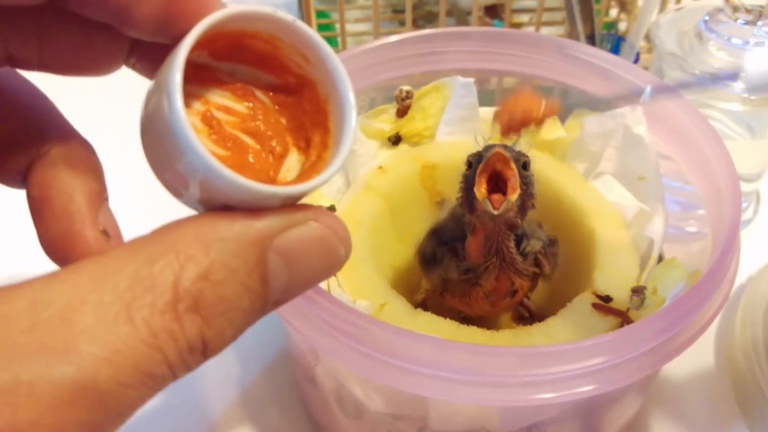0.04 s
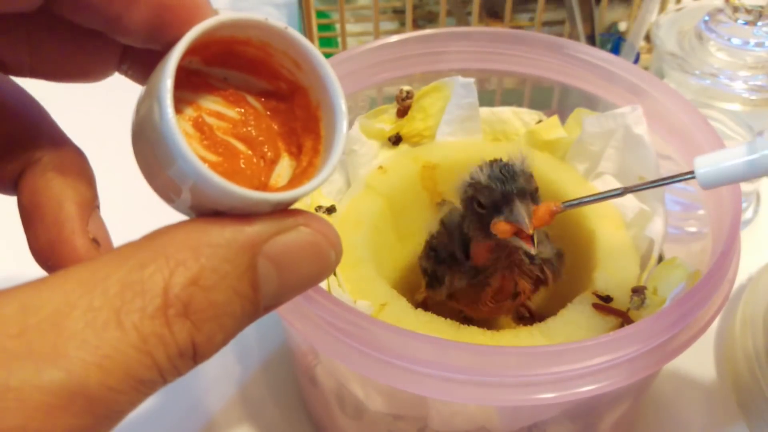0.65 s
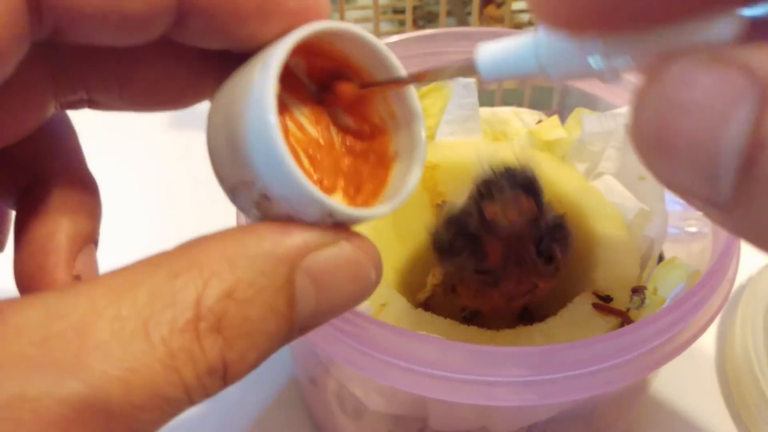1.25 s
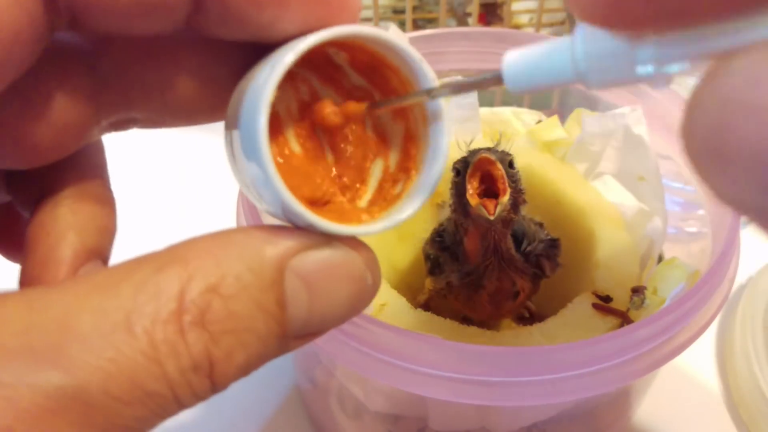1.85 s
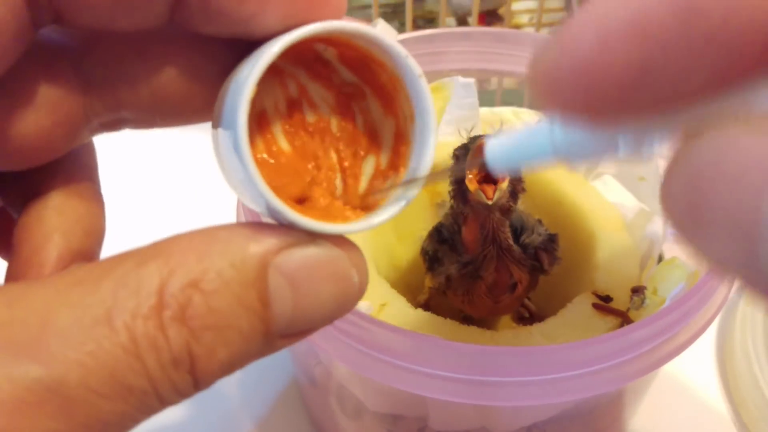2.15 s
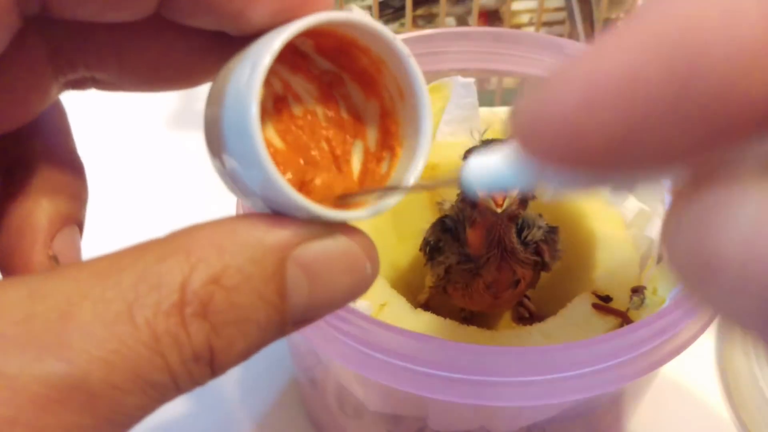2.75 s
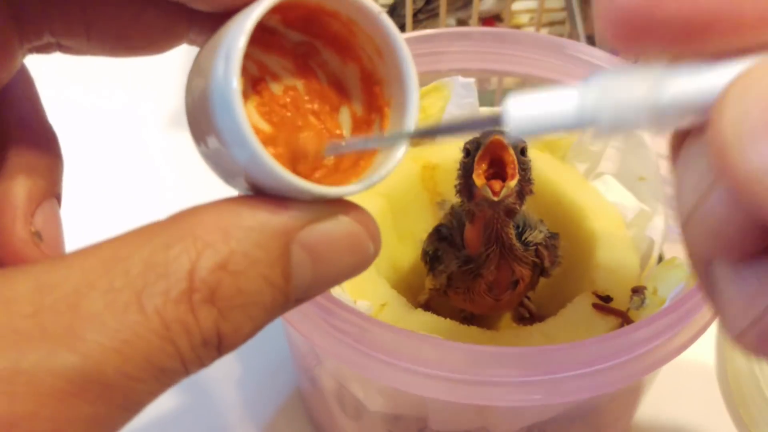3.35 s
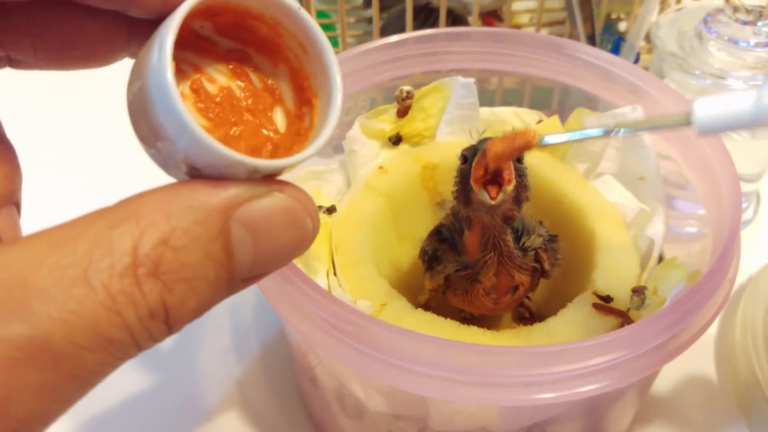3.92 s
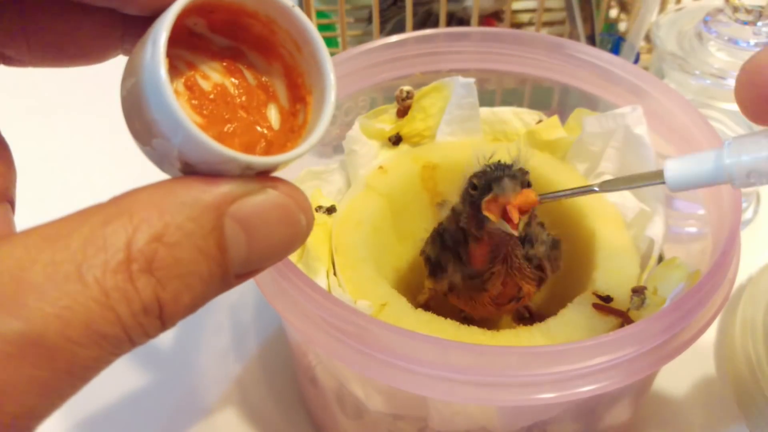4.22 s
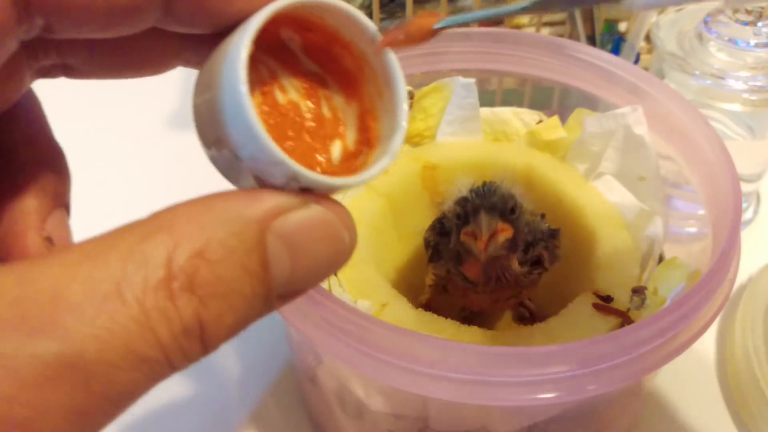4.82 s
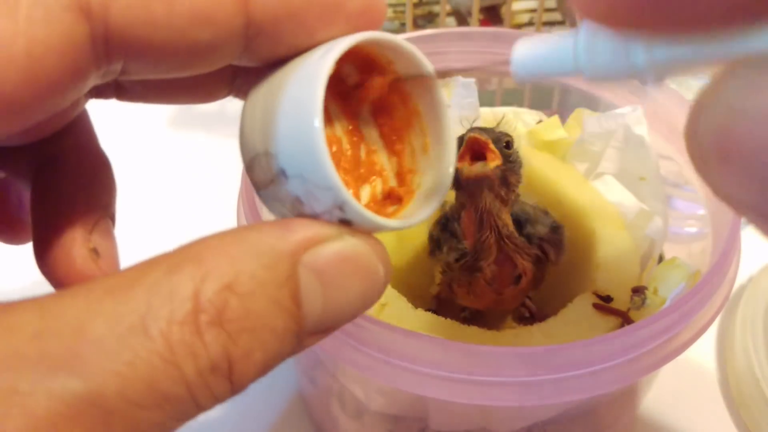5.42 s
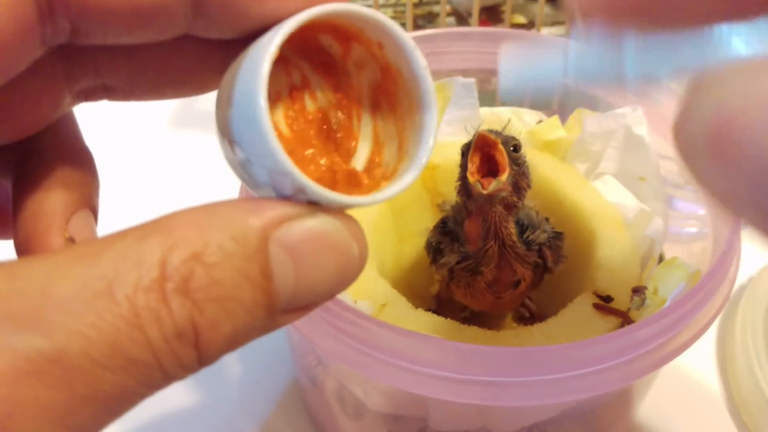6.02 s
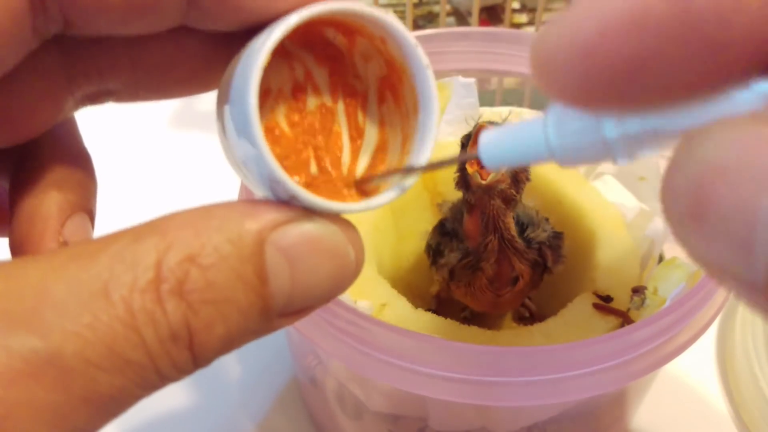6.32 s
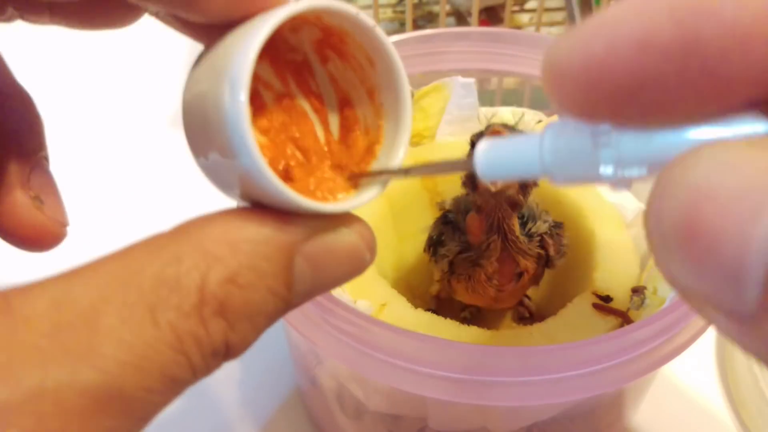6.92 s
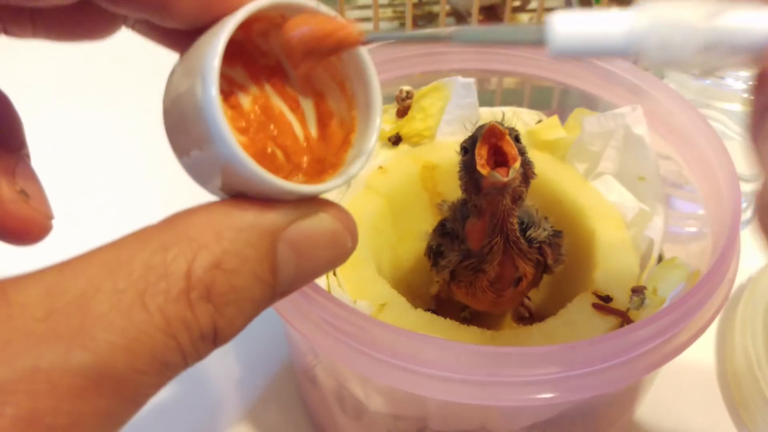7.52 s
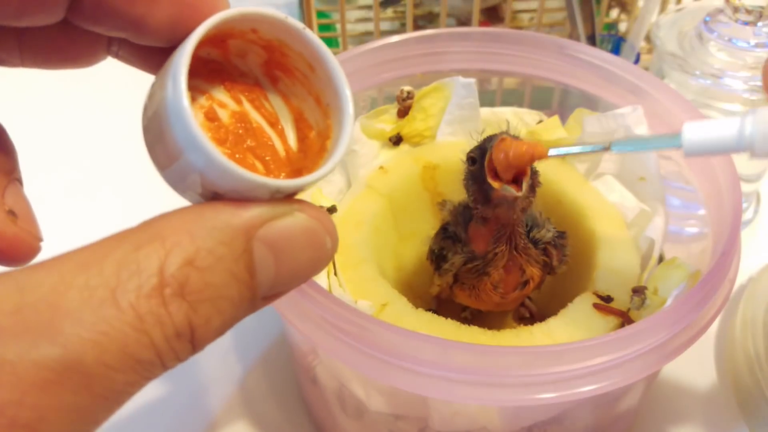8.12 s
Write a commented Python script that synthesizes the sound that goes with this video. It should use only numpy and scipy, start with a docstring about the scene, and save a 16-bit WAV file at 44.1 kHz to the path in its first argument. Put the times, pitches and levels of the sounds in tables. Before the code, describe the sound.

A chick begs close to the microphone in a quiet room, giving quick buzzy chirps that leap up and slide down, mixed with thin whistles that swell into shrill peaks. The calling runs throughout. After about a second, a small metal spatula starts ticking against a china cup in scattered clusters. Fingers rub and bump very softly, and a faint hum lies underneath.

```python
"""Feeding a canary chick

A chick begs in its nest bowl, close to the microphone in a quiet room, while it is fed from a small
china cup. One side of its syrinx gives buzzy chirps that leap up and slide down; the other gives thin
whistles that swell to a shrill peak. A metal spatula ticks on the cup, hands rub and bump softly,
and the room hums faintly."""
import sys
import numpy as np
from scipy import signal
from scipy.fft import rfft, irfft
from scipy.io import wavfile
from scipy.ndimage import map_coordinates

SR = 44100
rng = np.random.default_rng(int(sys.argv[2]) if len(sys.argv) > 2 else 0)


def materialize(psi):
    """Save the field psi as 16-bit PCM at rate SR to the path in sys.argv[1].

    A 1-D psi becomes a single channel; in a 2-D psi each row is a channel.
    """
    bounded = np.clip(np.atleast_2d(psi).T, -1, 1)
    quanta = np.round(bounded * 32767).astype(np.int16)
    wavfile.write(sys.argv[1], SR, quanta)


N = 359856
DROOP_HZ = 950  # pitch drop as the push behind a whistle or shriek ends


def undb(db):
    """Decibels to gain."""
    return 10 ** (np.asarray(db) / 20)


def unit(x):
    """Scale to rms 1."""
    return x / np.sqrt(np.mean(x ** 2))


def add(out, start, x):
    """Mix x into out from start seconds on."""
    i = int(start * SR)
    out[..., i:i + x.shape[-1]] += x[..., :N - i]


def noise(n, points):
    """Noise of rms 1, coloured by (frequency [Hz], level [dB]) points."""
    hz, db = np.transpose(points)
    bins_hz = np.maximum(np.arange(n // 2 + 1) * SR / n, 1)
    colour = undb(np.interp(np.log(bins_hz), np.log(hz), db))
    return unit(irfft(rfft(rng.standard_normal(n)) * colour, n))


def wander(n, hz):
    """Smooth random drift, spread near 1, that changes about hz times a second."""
    knots = rng.standard_normal(n)[:int(n * hz / SR) + 2]
    return map_coordinates(knots, [np.arange(n) * hz / SR], order=3, mode="nearest")


def turn(hz):
    """Phase of a moving frequency."""
    return 2 * np.pi * np.cumsum(hz) / SR


def fade(t, attack_s, release_s):
    """Linear attack, hold, linear release."""
    return np.clip(np.minimum(t / attack_s, (t[-1] - t) / release_s), 0, 1)


def panned(x, db):
    """Constant-power pan, with the left db louder than the right."""
    gain = undb(np.array([[1], [-1]]) * db / 2)
    return x * gain / np.sqrt(np.mean(gain ** 2, axis=0))


def room_tone(air_db=-62):
    """Still air, narrower in the bass, under a faint wavering hum of mains and fan."""
    # spectrum of the air: (frequency [Hz], relative level [dB])
    air_colour = [(12, -27), (30, -9), (60, -3.5), (110, -9), (330, -10), (500, -15.5), (1200, -19.5),
                  (2600, -19.5), (5000, -27.5), (10000, -31.5), (16000, -35.5)]
    # mains and fan tones: (frequency [Hz], rms level [dB])
    hum_tones = [(59.3, -81), (119, -75), (365, -89), (790, -81), (1018, -81.5), (1244, -84.5)]
    side_colour = [(hz, db + np.interp(np.log(hz), np.log([200, 1200]), [-8, -1]))
                   for hz, db in air_colour]
    mid = noise(N, air_colour)
    side = undb(-2) * noise(N, side_colour) * np.array([[1], [-1]])
    hum = sum(np.sqrt(2) * undb(db + 1.1 * wander(N, 3)) * np.sin(turn(hz + wander(N, 4.1)))
              for hz, db in hum_tones)
    return (mid + side) * undb(air_db + .5 * wander(N, 1.4)) + hum


def high_voice(hz, droop_hz, db, shudder_hz=424, unstable_hz=7450, unstable_width_hz=430):
    """A nearly pure tone that shudders when it is pushed between its two registers."""
    n = len(hz)
    push = np.clip((db + 49.5) / 14, 0, 1)
    shudder = push * np.exp(-((hz - unstable_hz) / unstable_width_hz) ** 2)
    flutter = shudder * np.cos(turn(shudder_hz * (1 + .15 * wander(n, 200))))
    unsteady = np.interp(hz, [7600, 8300], [1, .25])
    waver = unsteady * (.0056 * wander(n, 110) + .006 * wander(n, 1200))
    phase = turn((hz - droop_hz) * (1 + waver)) + .26 * flutter
    # the octave fades as the pitch climbs into the beak's resonance
    octave_db = np.interp(hz, [7000, 7600], [-18, -40]) - .6 * np.maximum(db + 47, 0)
    tone = np.sin(phase) + undb(octave_db) * np.sin(2 * phase)
    sway = (1 + .5 * flutter) * undb((1.2 * unsteady + 3.4 * shudder) * wander(n, 150))
    return np.sqrt(2) * tone * sway * undb(db)


def whistle(length, hz, db, swell_db, scoop_hz=938, scoop_s=.028, droop_s=.01):
    """The pitch scoops up and holds; a whistle with little swell droops at its end."""
    t = np.arange(int(length * SR)) / SR
    pitch = hz - scoop_hz * np.exp(-t / scoop_s)
    slack = np.interp(swell_db, [4, 9], [1, 0])
    droop = slack * DROOP_HZ * np.exp((t - length) / droop_s)
    level_db = db + swell_db * (t / length) ** 3
    return high_voice(pitch, droop, level_db) * fade(t, attack_s=.03, release_s=.014)


def high_calls():
    """Whistles and shrieks; their beam favours one side by an amount that shifts as the head turns."""
    # thin whistles: (time [s], length [s], pitch [Hz], level [dB], swell [dB], left over right [dB])
    whistles = [(.052, 0.16, 6900, -45.5, 12, 6), (1.6, 0.094, 7230, -53, 10, 14),
                (2.01, 0.15, 7050, -48.5, 2.5, 19), (2.375, 0.18, 7160, -47.5, 16, 16),
                (2.79, 0.18, 7120, -50.5, 12, 24), (3.226, .198, 6920, -45, -1, 5.5),
                (3.92, .075, 6780, -46, 14, 7), (5.435, 0.074, 7120, -58, 30, 14),
                (5.74, .14, 7220, -52, 19, 12), (6.14, .152, 7000, -51, 2, 11),
                (6.495, .18, 7090, -46.5, -3.5, 18), (6.965, 0.12, 7160, -48, 23, 5),
                (7.41, 0.14, 6910, -51, 3, 10), (8.04, 0.098, 7040, -47.5, 22, 6)]
    # shrill peaks: (time [s], length [s], top pitch [Hz], level [dB], left over right [dB])
    shrieks = [(.19, .11, 8535, -18, 12), (1.711, .067, 8680, -20, 20), (2.513, .048, 7400, -32.5, 14),
               (2.957, 0.053, 7600, -25, 5), (3.362, .05, 7020, -38.5, 2), (3.981, 0.12, 8500, -20.5, 10.5),
               (5.508, 0.067, 8540, -22.5, 11), (5.87, 0.071, 8150, -27, 11),
               (7.053, 0.085, 8410, -26.5, 22), (8.106, 0.097, 8130, -26, 9)]
    out = np.zeros((2, N))
    for calls, voice in (whistles, whistle), (shrieks, shriek):
        for start, *shape, pan_db in calls:
            add(out, start, panned(voice(*shape), pan_db))
    return out


def by_effort(relaxed, forced, effort):
    """Blend from the relaxed value at effort 0 to the forced one at 1."""
    return np.interp(effort, [0, 1], [relaxed, forced])


def chirp_pitch(t, lead_hz, peak_hz, effort, rest_hz=1900, rise_s=.008, relax_s=.072):
    """The membrane snaps tight from a short shelf, lets go at t = 0, then slackens slowly."""
    slide_hz, let_go_s = by_effort(2510, 3533, effort), by_effort(.016, .008, effort)
    leap = lead_hz + (peak_hz - lead_hz) * np.exp(-(t / rise_s) ** 2)
    let_go = (peak_hz - slide_hz) / (1 + (t / let_go_s) ** 2) ** 2
    slide = rest_hz + (slide_hz - rest_hz) * np.exp(-t / relax_s)
    return np.where(t < 0, leap, slide + let_go)


def chirp_level(t, length, effort, peak_db, slide_db):
    """Envelope in dB: a softer lead-in, a peak at the leap, then a fading slide."""
    lead_db = peak_db + by_effort(-8.5, -6, effort)
    tail_db = by_effort(-55.5, -43, effort ** 2)
    points = [(t[0], lead_db - 15.5), (-.022, lead_db - 6), (-.013, lead_db + 3),
              (-.009, peak_db), (.005, peak_db), (.016, (peak_db + slide_db) / 2 - 1),
              (min(.035, length / 2), slide_db), (.78 * length, tail_db),
              (length, tail_db - 12.5), (length + .01, tail_db - 32)]
    return np.interp(t, *np.transpose(points)) + .85


def chirp(lead_s, length, lead_hz, peak_hz, effort, peak_db, slide_db):
    """A gliding tone chopped by a fast flutter; soft calls start clean, forced ones with a rasp."""
    t = np.arange(-lead_s, length + .01, 1 / SR)
    n = len(t)
    hz = chirp_pitch(t, lead_hz, peak_hz, effort)
    force = np.clip((slide_db + 50) / 11, 0, 1)
    # a short shelf of steady pitch leads into the strained leap
    shelf = np.interp(t, [-.014, -.008], [1, 0])
    strain = (1 - shelf) / (1 + (t / .013) ** 2)
    # the flutter quickens, deepens and grows uneven with tension
    buzz_hz = by_effort(271.8, 543.3, effort ** 2) * (1 + 1.1 * strain)
    flutter = turn(buzz_hz * (1 + (.08 + .12 * strain) * wander(n, 397.7)))
    depth = .6 + .25 * strain * effort - .45 * shelf * (1 - force)
    jitter = .011 + .0067 * strain + .0191 * shelf * force
    # the pitch rises with each flutter pulse, so the sidebands lie above the tone
    phase = turn(hz * (1 + jitter * wander(n, 1005) + .012 * wander(n, 70))) + depth * np.sin(flutter)
    pulse = unit(np.exp(depth * np.cos(flutter))) * undb(2.4 * wander(n, 400))
    bright_db = np.interp(t, [-.014, -.004, .02], [-9, -15, -17]) + by_effort(-3, -.5, effort)
    tone = np.sin(phase)
    for k in range(2, 5):
        beak_db = np.interp(k * hz, [9000, 12000, 18000], [0, -4, -22])
        tone += undb(bright_db + beak_db - 4.94 * (k - 3)) * np.sin(k * phase) * (k * hz < SR * .42)
    rasp_db = np.interp(t, [-.03, .004, .03], [-10, -18, -21]) + force * (3 + 3 * shelf)
    rasp = noise(n, [(1400, -23.5), (3000, -11), (5500, 6), (8000, -2.5), (11000, -12.5), (15000, -14.5)])
    voice = np.sqrt(2) * tone * undb(-4 * shelf * force) + rasp * undb(rasp_db)
    return voice * pulse * undb(chirp_level(t, length, effort, peak_db, slide_db))


def chirps(lead_s=.028):
    """The run of begging chirps; the open beak beams their treble to the left."""
    # begging calls: (time of peak [s], slide length [s], lead-in pitch [Hz], peak pitch [Hz],
    # effort [0-1], peak level [dB], slide level [dB])
    calls = [(0.108, 0.065, 4000, 5640, 0.07, -37.5, -59), (0.153, 0.13, 3700, 5740, 0.9, -34, -39),
             (0.476, 0.049, 3650, 4950, 0.2, -37.5, -60), (0.56, 0.097, 3300, 5730, 0.14, -38.5, -56),
             (.991, .11, 3500, 6370, 1, -33, -37.5), (1.25, 0.1, 3800, 5070, 0.2, -35, -44),
             (1.57, 0.086, 3950, 6180, 0.34, -39, -61), (1.704, 0.11, 3900, 6540, 0.93, -33, -36.5),
             (1.97, .14, 3650, 5490, 0.96, -30.5, -40.5), (2.304, .09, 3500, 6160, 0.42, -40, -55),
             (2.488, 0.077, 4100, 5700, 0.08, -45, -55.5), (2.667, 0.1, 3750, 5690, 0.26, -41, -51),
             (2.754, 0.13, 4200, 6190, 0.87, -33, -37.5), (3.144, 0.098, 3350, 6230, 0.32, -41.5, -52),
             (3.274, .11, 3950, 5450, 0.31, -38, -48), (3.626, 0.087, 3400, 5950, 0.28, -43, -51),
             (3.746, 0.087, 3700, 5800, 0.95, -32, -38.5), (3.893, 0.13, 4200, 5480, 0.93, -30.5, -37),
             (4.245, 0.087, 3950, 6250, 0.37, -40, -50), (4.373, 0.1, 4050, 5520, 0.34, -39, -48),
             (4.684, 0.058, 3500, 5950, 0.18, -48, -52), (4.794, 0.11, 4200, 6200, 0.81, -32, -39),
             (4.876, .11, 3200, 5480, 0.3, -41.5, -51), (5.353, 0.13, 4200, 6450, 0.94, -30.5, -38.5),
             (5.692, 0.13, 3850, 5730, 0.98, -29, -38.5), (6.34, 0.12, 3200, 6070, 0.26, -36.5, -49),
             (6.423, 0.12, 4200, 6550, 0.99, -30.5, -42), (6.712, 0.07, 3800, 5530, 0.33, -42, -61.5),
             (7.007, 0.14, 3700, 6280, 0.32, -39.5, -47), (7.042, 0.13, 3100, 5200, 0.95, -33, -40),
             (7.268, 0.14, 3100, 5290, 0.32, -35.5, -45), (7.329, 0.13, 3800, 5840, 0.98, -30, -38.5),
             (7.855, 0.12, 3850, 5930, 0.32, -39.5, -50.5)]
    # beam of the beak: (frequency [Hz], left over right [dB])
    beam = [(2500, 0.6), (5500, 8), (8000, 13), (11000, 13)]
    out = np.zeros(N)
    for peak_time, *shape in calls:
        add(out, peak_time - lead_s, chirp(lead_s, *shape))
    beam_db = np.interp(np.arange(N // 2 + 1) * SR / N, *np.transpose(beam))
    return irfft(panned(rfft(out), beam_db), N)


def shriek(length, hz, db, break_hz=7240, break_db=-7, climb_at_s=.025, climb_s=.0056):
    """Pitch and level climb together into the loud register, hold, then drop away."""
    t = np.arange(int(length * SR)) / SR
    climb = 1 / (1 + np.exp((climb_at_s - t) / climb_s))
    top_hz = hz - 900 * (t - climb_at_s)  # the held top sinks slowly
    pitch = break_hz + (top_hz - break_hz) * climb
    droop = DROOP_HZ * np.exp((t - length) / .007)
    level_db = db + break_db * (1 - climb)
    return high_voice(pitch, droop, level_db) * fade(t, attack_s=.0091, release_s=.0055)


def hoarse_notes():
    """Barely voiced notes with an unsteady pitch."""
    # faint notes between the calls: (time [s], length [s], pitch [Hz], level [dB])
    notes = [(0.714, 0.079, 2750, -60), (0.854, 0.14, 2610, -61.5), (5.139, .11, 2620, -70.5),
             (5.975, 0.025, 3200, -51), (6.195, 0.19, 2540, -65)]
    out = np.zeros(N)
    for start, length, hz, db in notes:
        n = int(length * SR)
        tone = np.sin(turn(hz * (1 + .052 * wander(n, 783))))
        add(out, start, undb(db) * np.sqrt(2 * np.hanning(n)) * tone)
    return out


def spatula_taps(accent_db=8, delay_s=.0015):
    """Each touch of the spatula clicks and rings the cup; the contact point picks the brightest modes."""
    # spatula on the cup: (time [s], level [dB], brightest ring [Hz])
    taps = [(1.275, -21.5, 3300), (1.34, -23.5, 12600), (1.513, -11.5, 8600), (2.118, -25, 6600),
            (2.165, -18.5, 7570), (2.544, -20.5, 6940), (2.922, -12.5, 8500), (3.161, -16, 10700),
            (4.986, -39, 1570), (5.067, -29.5, 6150), (5.134, -34.5, 7260), (5.296, -36.5, 4000),
            (6.124, -21, 3160), (6.157, -19.5, 4250), (6.173, -34, 3330), (6.18, -13.5, 11800),
            (6.517, -28, 2270), (6.553, -27, 6660), (6.912, -21.5, 6400), (7.109, -19, 8100)]
    # modes of the cup, damped by the fingers: (frequency [Hz], level [dB], t60 [s])
    cup_modes = [(900, -12, 0.0084), (3223, -6, 0.03), (4395, 3, 0.015), (6430, 2, 0.011),
                 (7380, 1.5, 0.016), (9350, -5, 0.016), (10300, -7.5, 0.013), (11980, -2.5, 0.0071),
                 (14300, -22, 0.0072)]
    out, t = np.zeros((2, N)), np.arange(SR // 25) / SR
    for start, db, bright_hz in taps:
        ring = 0
        for hz, mode_db, t60 in cup_modes:
            nearness = np.exp(-(np.log(hz / bright_hz) / .49) ** 2)
            struck_db = mode_db + 2.5 * rng.standard_normal() + accent_db * (nearness - 1)
            detuned_hz = hz * (1 + .019 * rng.standard_normal())
            ring += undb(struck_db - 60 * t / t60) * np.sin(2 * np.pi * (detuned_hz * t + rng.random()))
        click_colour = [(bright_hz / 15, -30), (bright_hz * .6, 0), (16000, -3)]
        click = undb(1) * noise(len(t), click_colour) * np.exp(-t / .0009)
        hit = (ring + click) * (1 - np.exp(-t / .000067))
        add(out, start + delay_s, panned(hit / np.abs(hit).max() * undb(db + 1), db=8))
    return out


def finger_rustles():
    """Skin rubs dully and unevenly as the grip changes."""
    # fingers shifting on cup and spatula: (time [s], length [s], level [dB])
    rubs = [(1.658, 0.35, -63.5), (2.021, 0.31, -66), (4.536, 0.12, -67.5), (4.849, 0.32, -63.5)]
    out = np.zeros(N)
    for start, length, db in rubs:
        n = int(length * SR)
        rub = noise(n, [(70, -15), (170, 5), (350, -4.5), (800, -4.5), (1600, -18), (6000, -35.5)])
        add(out, start, rub * np.hanning(n) * undb(db + 2.5 * wander(n, 40)))
    return out


def hand_bumps(attack_s=.0088):
    """Soft contacts that swell briefly and die away."""
    # bumps of hands and cup: (time [s], pitch [Hz], level [dB], t60 [s])
    bumps = [(2.105, 551, -51, 0.24), (5.02, 799, -51, 0.27), (7.919, 100, -45.5, 0.25),
             (8.11, 100, -42, 0.17)]
    out, t = np.zeros(N), np.arange(SR // 3) / SR
    for start, hz, db, t60 in bumps:
        envelope = undb(db - 60 * t / t60) * (1 - np.exp(-t / attack_s))
        add(out, start, envelope * np.sin(turn(hz + 18 * wander(len(t), 80))))
    return out


def scratches(tick_count=14, tick_s=.0013):
    """Clusters of tiny sticky ticks, well to the left."""
    # short moist scratches: (time [s], length [s], level [dB])
    clusters = [(2.321, 0.044, -50), (5.958, 0.059, -52.5), (6.139, 0.05, -39.5)]
    out = np.zeros(N)
    for start, length, db in clusters:
        t = np.arange(int(length * SR)) / SR
        age = t - length * rng.random((tick_count, 1))
        grains = np.sum(np.exp(-np.abs(age) / tick_s) * (age > 0), axis=0) * np.hanning(len(t))
        hiss = noise(len(t), [(1500, -25), (3300, -2), (7000, -6), (14000, -10)])
        add(out, start, undb(db) * unit(grains * hiss))
    return panned(out, db=16)


def delay_right(x, samples):
    """The right microphone hears the sound a few samples late."""
    return np.array([x[0], np.pad(x[1], (samples, 0))[:N]])


def reverb(x, t60):
    """Dense echoes of the left channel that die away in t60 seconds, different on each side."""
    t = np.arange(SR // 2) / SR
    envelope = undb(-60 * t / t60) * np.clip(t / .0016, 0, 1)
    colour = [(3000, 3.5), (8500, 1), (15000, -8.5)]
    echoes = np.array([noise(len(t), colour) * envelope for _ in range(2)])
    echoes /= np.sqrt(np.sum(echoes ** 2, axis=1, keepdims=True))
    return signal.fftconvolve(x[:1], echoes, axes=1)[:, :N]


def scene():
    """Bird and cup sit nearer the left microphone; bowl and hands scatter first, then the room."""
    buzzy = delay_right(chirps(), samples=3)
    shrill = delay_right(high_calls(), samples=1)
    taps = delay_right(spatula_taps(), samples=4)
    scatter = reverb(undb(-13) * buzzy + undb(-19.5) * shrill + undb(-29.5) * taps, t60=.033)
    tail = reverb(undb(-12) * buzzy + undb(-20.5) * shrill + undb(-21) * taps, t60=.28)
    small_sounds = scratches() + hoarse_notes() + hand_bumps() + finger_rustles()
    return buzzy + shrill + taps + scatter + tail + small_sounds + room_tone()


def record(dry):
    """A steep low-pass cuts the top above 16 kHz."""
    return signal.sosfilt(signal.ellip(8, .2, 70, 16000, fs=SR, output="sos"), dry)


dry = scene()
out = record(dry)
materialize(out)
```